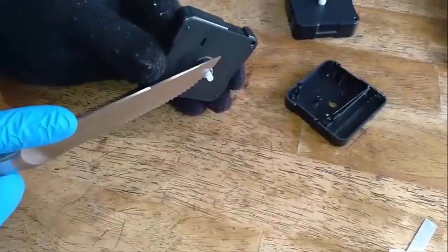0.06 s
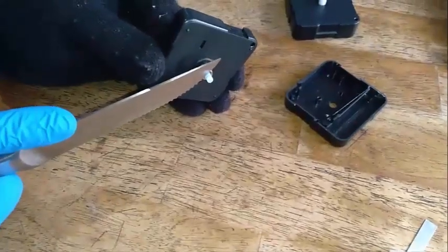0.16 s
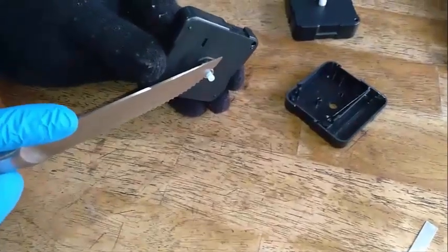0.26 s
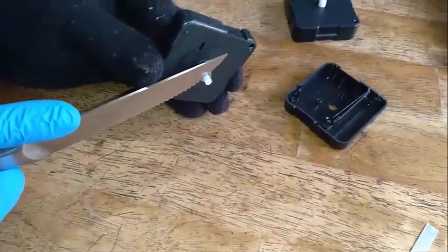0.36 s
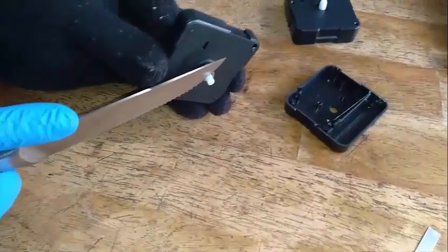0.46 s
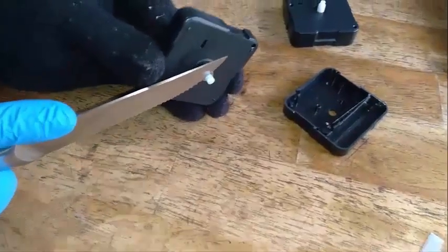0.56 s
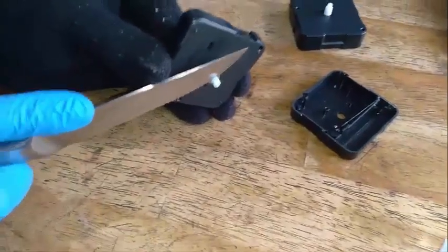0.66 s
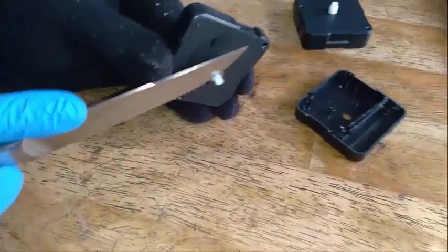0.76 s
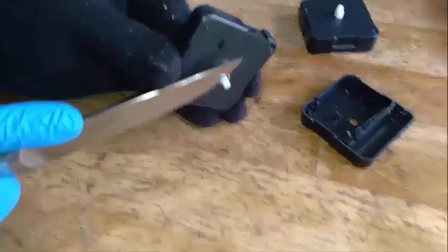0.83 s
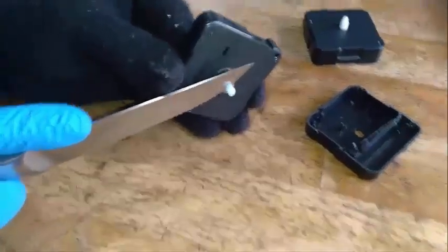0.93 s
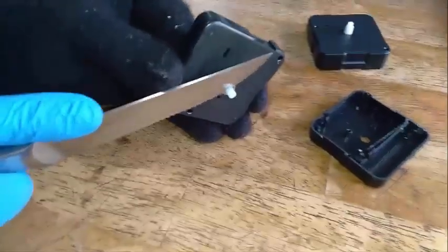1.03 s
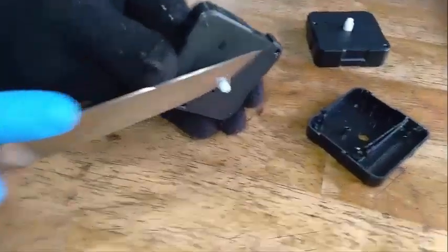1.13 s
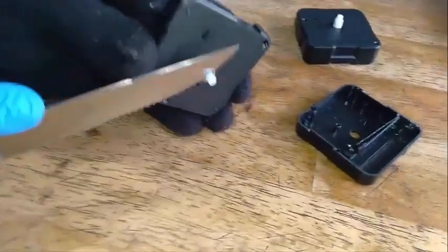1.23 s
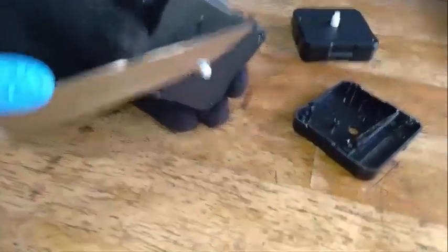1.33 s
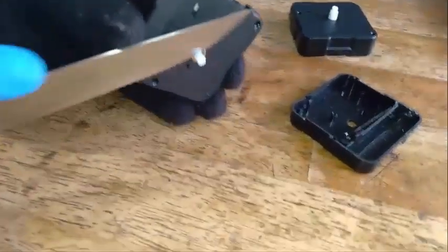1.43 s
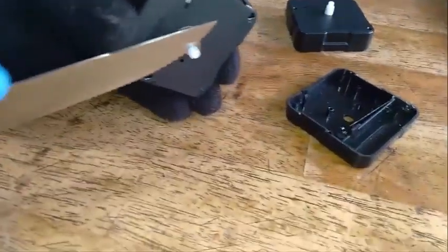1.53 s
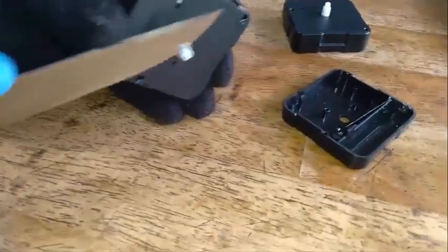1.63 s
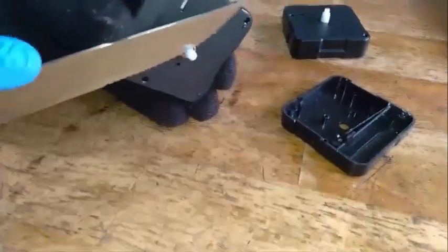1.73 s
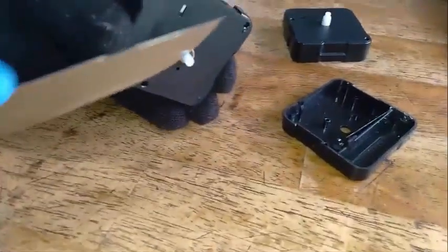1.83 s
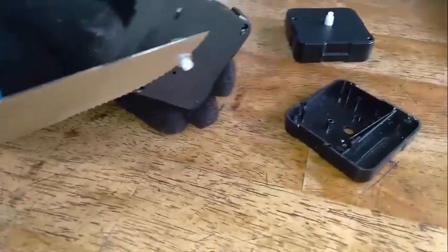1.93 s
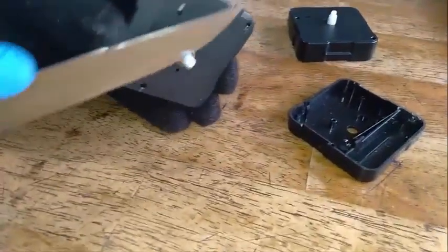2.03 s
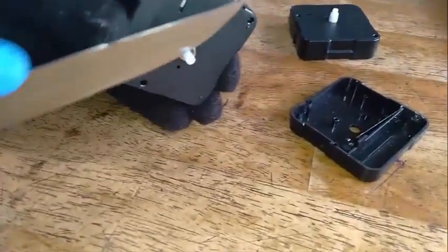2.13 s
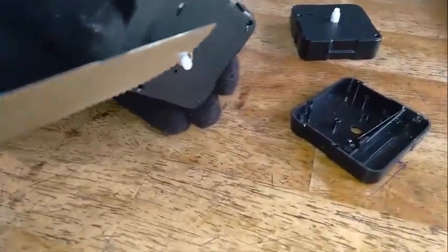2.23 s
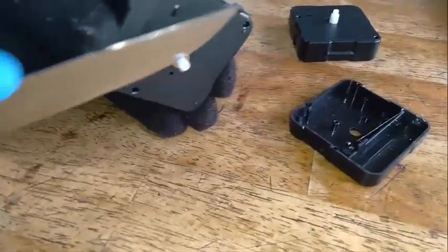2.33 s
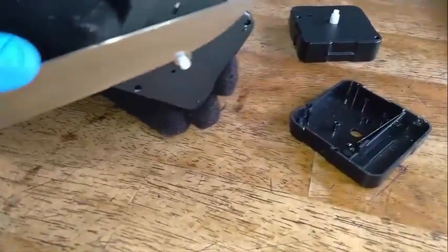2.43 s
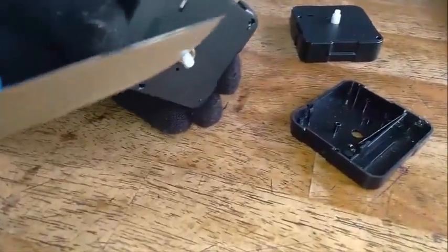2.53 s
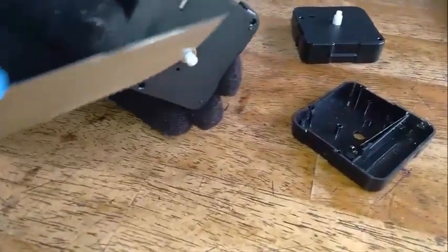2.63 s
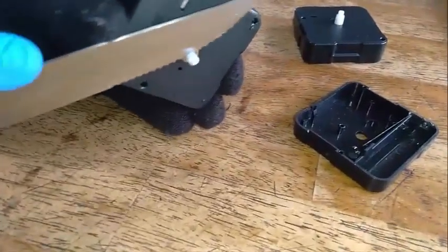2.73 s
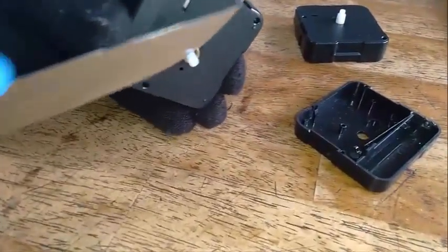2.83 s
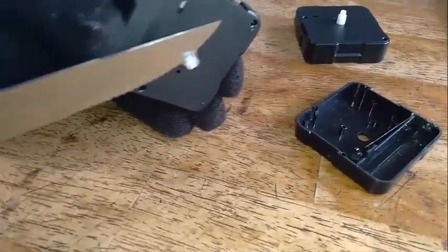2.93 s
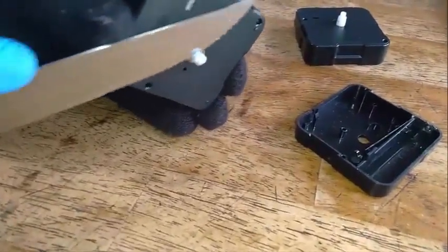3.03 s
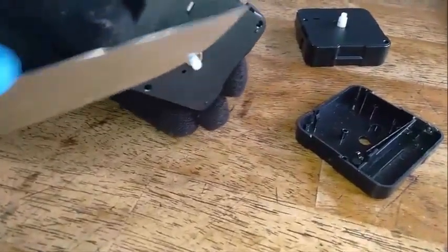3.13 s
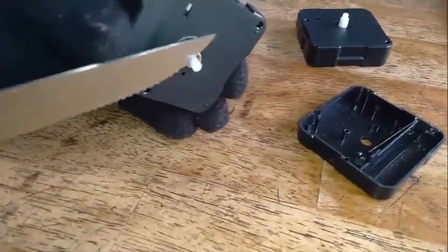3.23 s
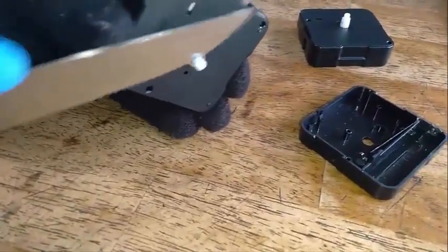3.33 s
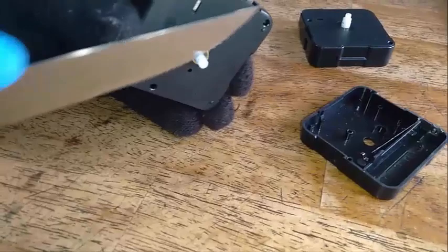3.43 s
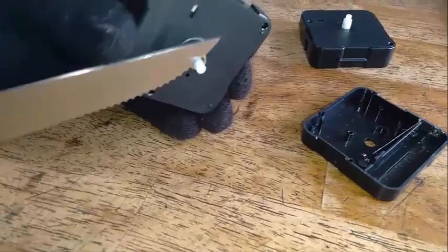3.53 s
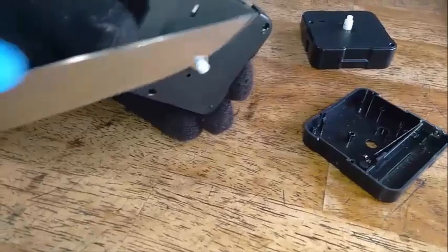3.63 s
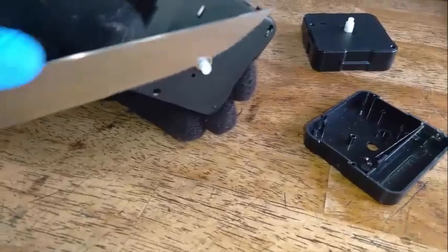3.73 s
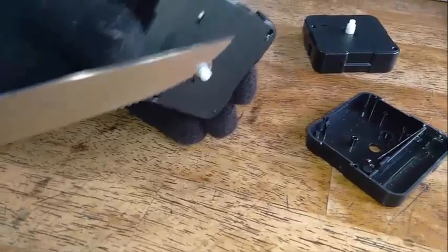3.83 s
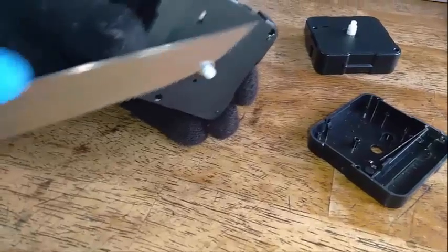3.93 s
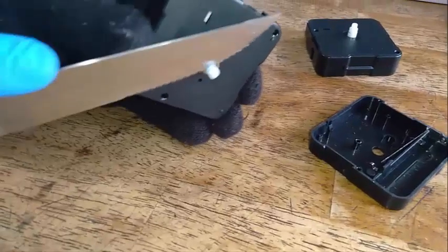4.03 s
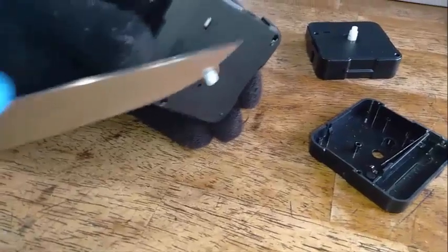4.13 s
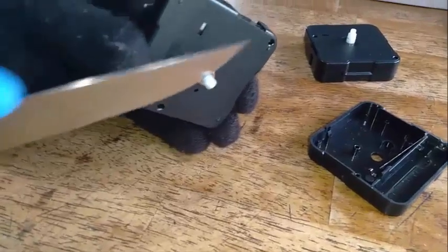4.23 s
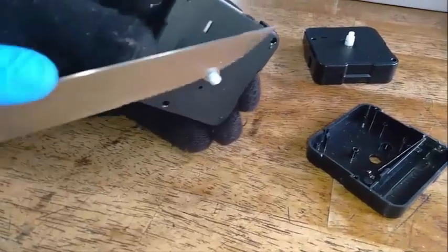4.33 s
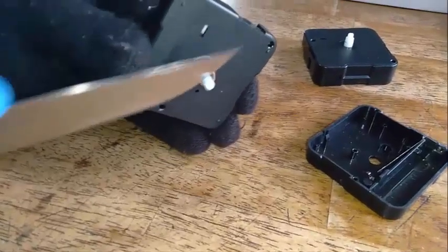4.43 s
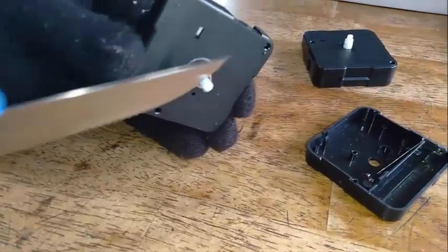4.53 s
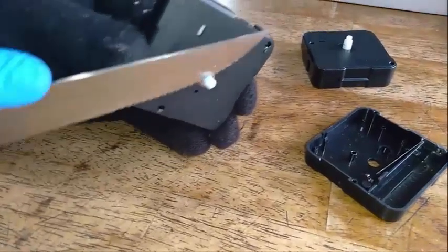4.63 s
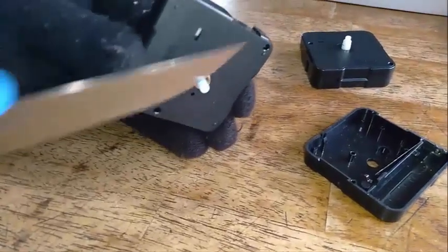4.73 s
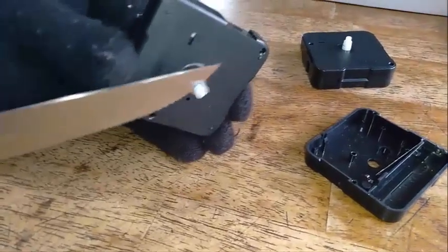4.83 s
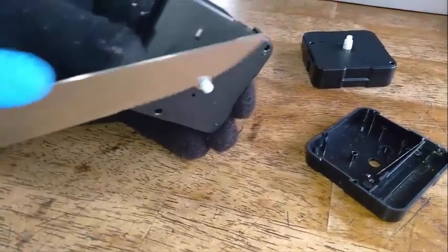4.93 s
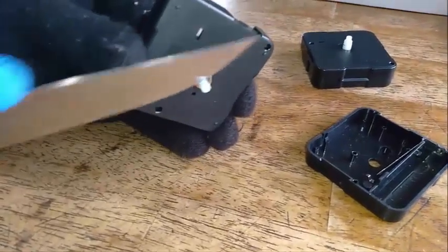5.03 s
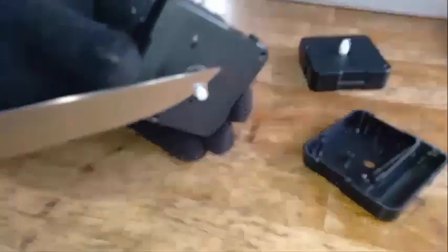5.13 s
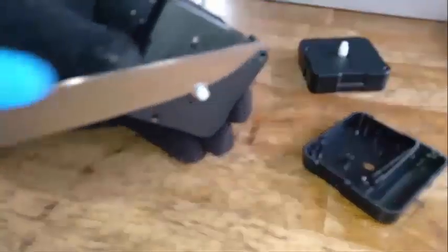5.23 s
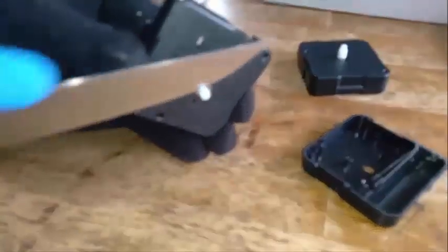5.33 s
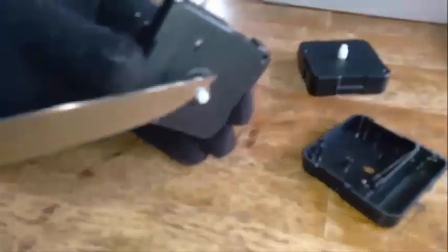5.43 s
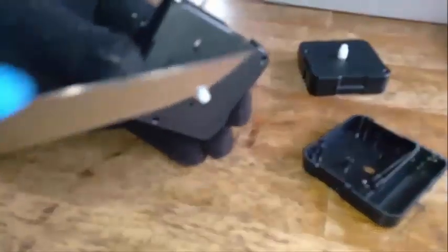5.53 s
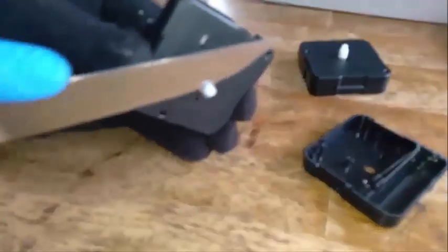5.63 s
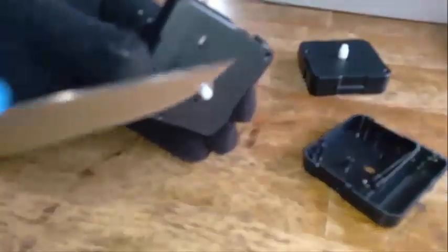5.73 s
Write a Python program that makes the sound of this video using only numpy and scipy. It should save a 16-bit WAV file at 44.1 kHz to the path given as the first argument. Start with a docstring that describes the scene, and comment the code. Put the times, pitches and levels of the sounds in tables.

```python
"""Light ticks over a faint motor hum, then rasping strokes: a serrated steel knife is set on the plastic
shaft of a small clock movement, held on a wooden bench, and saws back and forth. In each stroke a few
teeth catch and snap free; every snap rings the blade, rattles the hollow case and knocks the bench.
The blade rubs with a hiss and a faint groan during some strokes and between the early ones.
The strokes grow firmer as the cut deepens. Close stereo in a small, quiet room."""
import sys
import numpy as np
from scipy import signal
from scipy.fft import rfft, irfft, next_fast_len
from scipy.io import wavfile
from scipy.ndimage import map_coordinates

SR = 44100
rng = np.random.default_rng(int(sys.argv[2]) if len(sys.argv) > 2 else 0)


def wrap_up_sound(samples):
    """Save the sound to the file named by the first command line argument, as 16-bit audio."""
    columns = np.atleast_2d(samples).T
    # keep every value between -1 and 1, then stretch to whole-number steps
    tamed = np.clip(columns, -1, 1)
    steps = np.round(tamed * 32767).astype(np.int16)
    wavfile.write(sys.argv[1], SR, steps)


N = 254898


def amp(db):
    return 10 ** (np.asarray(db) / 20)


def unit_rms(x):
    return x / np.sqrt(np.mean(x ** 2) + 1e-20)


def unit_energy(spectra):
    """One stereo waveform of energy 1 per tooth."""
    x = irfft(spectra)
    return x / np.sqrt(np.sum(x ** 2, axis=(1, 2), keepdims=True))


def curve_at(points, hz):
    """Interpolate (freq_hz, value) points on a log frequency axis."""
    freq_hz, values = np.transpose(points)
    return np.interp(np.log(hz + 1), np.log(freq_hz + 1), values)


def pan(left_minus_right_db):
    return amp(np.array([[.5], [-.5]]) * left_minus_right_db)


def filtered(x, response):
    """Apply the gain response(hz)."""
    size = next_fast_len(N + SR // 2)
    return irfft(rfft(x, size) * response(np.fft.rfftfreq(size, 1 / SR)), size)[..., :N]


def wobble(rate_hz):
    """Smooth random curve, N samples."""
    knots = rng.standard_normal(int(N * rate_hz / SR) + 4)
    return map_coordinates(knots, [np.arange(N) * rate_hz / SR])


def minimum_phase(points, hz):
    """Causal response from (freq_hz, gain_db) points."""
    cepstrum = irfft(np.log(amp(curve_at(points, hz))))
    half = len(hz) - 1
    cepstrum[1:half] *= 2
    cepstrum[half + 1:] = 0
    return np.exp(rfft(cepstrum))


def resonance(hz, centre_hz, width_hz):
    """One damped mode."""
    return 1j * hz * width_hz / (centre_hz ** 2 - hz ** 2 + 1j * hz * width_hz)


def burst(envelopes, correlation=0.066):
    """Spectra of fresh stereo noise under each envelope."""
    noise = rng.standard_normal((len(envelopes), 2, envelopes.shape[-1]))
    mix_rad = np.arcsin(correlation) / 2
    stereo = np.cos(mix_rad) * noise + np.sin(mix_rad) * noise[:, ::-1]
    return rfft(envelopes * stereo)


# Air spectrum: freq_hz, gain_db
AIR_SPECTRUM = [(20, -1), (300, 4), (800, -6), (3000, -15), (9000, -11), (11500, -11), (16000, -15)]
def room_air(level_db=-95):
    """Still air: steady, dark noise."""
    noise = rng.standard_normal((2, N))
    return amp(level_db) * unit_rms(filtered(noise, lambda hz: amp(curve_at(AIR_SPECTRUM, hz))))


# Motor harmonics: multiple, level_db
MOTOR_HARMONICS = [(2, -89.5), (3, -94), (4, -99), (5, -94.5), (6, -100), (7, -102), (8, -97), (9, -108),
                   (10, -110), (11, -108), (14, -111)]
def motor_hum(rotation_hz=29.1, phase_spread_rad=0.31):
    """A motor somewhere in the room; each harmonic reaches left and right at its own phase."""
    t = np.arange(N) / SR
    hum = np.zeros((2, N))
    for multiple, level_db in MOTOR_HARMONICS:
        cycles = multiple * rotation_hz * t + rng.random()
        offset_rad = phase_spread_rad * rng.standard_normal((2, 1))
        hum += np.sqrt(2) * amp(level_db) * np.sin(2 * np.pi * cycles + offset_rad)
    return hum


# Room decay: freq_hz, t60_s
ROOM_DECAY = [(200, 0.29), (530, 0.54), (1400, 0.17), (3700, 0.25), (9700, 0.22), (15000, 0.22)]
# Reverb colour: freq_hz, gain_db
ROOM_COLOUR = [(100, -12), (600, -23), (2000, -15), (5000, -17.5), (10000, -19.5), (15000, -20)]
def room_reverb(dry, segments=8, delay_s=0.0068, build_s=0.0017):
    """Short diffuse tail off the walls, new for each segment as hands and knife move."""
    out = np.zeros((2, N))
    for part in np.array_split(np.arange(N), segments):
        hz, t, noise = signal.stft(rng.standard_normal((2, SR // 2)), SR, nperseg=256)
        t60_s = curve_at(ROOM_DECAY, hz)[:, None]
        onset = 1 - np.exp(-np.maximum(t - delay_s, 0) / build_s)
        tail = signal.istft(noise * amp(-60 * t / t60_s) * onset / np.sqrt(t60_s), SR, nperseg=256)[1]
        tail /= np.linalg.norm(tail[0])
        wet = signal.fftconvolve(dry[:, part], tail, axes=1)[:, :N - part[0]]
        out[:, part[0]:part[0] + wet.shape[1]] += wet
    return filtered(out, lambda hz: amp(curve_at(ROOM_COLOUR, hz)))


# Friction spectrum: freq_hz, gain_db
FRICTION_SPECTRUM = [(30, -28), (400, -10.5), (1000, -5.5), (1650, -15), (2700, -4.5), (4900, 7),
                     (7000, -3), (10000, 2), (12500, -11), (16000, -25)]
# Rubs, during some strokes and between the early ones: start_s, end_s, hiss_db, groan_db
BLADE_RUBS = [(0.495, 0.559, -69, -90), (0.56, .675, -86, -100), (0.857, 0.913, -55.5, -80),
              (0.882, 0.995, -66.5, -87), (1.187, 1.248, -50.5, -78), (1.257, 1.36, -81, -74),
              (1.427, 1.574, -62.5, -64), (1.538, 1.7, -81, -76), (1.871, 1.977, -47.5, -74),
              (4.474, 4.57, -48, -66), (5.108, 5.206, -49.5, -63), (5.458, 5.519, -43.5, -74)]
def rubbing(grain_db=3, grain_hz=700, groan_hz=1620, groan_width_hz=380):
    """Steel rubs over plastic: a grainy hiss and a faint groan of the case."""
    t = np.arange(N) / SR
    grains = rng.standard_normal((2, N)) * amp(grain_db * wobble(grain_hz))
    hiss = unit_rms(filtered(grains, lambda hz: amp(curve_at(FRICTION_SPECTRUM, hz))))
    groan = unit_rms(filtered(grains, lambda hz: resonance(hz, groan_hz, groan_width_hz)))
    out = np.zeros((2, N))
    for start_s, end_s, hiss_db, groan_db in BLADE_RUBS:
        arch = np.sin(np.pi * np.clip((t - start_s) / (end_s - start_s), 0, 1))
        out += arch * (amp(hiss_db) * hiss + amp(groan_db) * groan)
    return out


# Bench spectrum: freq_hz, gain_db
BENCH_SPECTRUM = [(20, -2), (70, -3.5), (170, -1.5), (300, -6), (500, -10.5), (1500, -19)]
def bench_knock(envelopes, hz):
    """The wood under the case answers each snap with a dull knock."""
    return unit_energy(minimum_phase(BENCH_SPECTRUM, hz) * burst(envelopes))


# Case modes: freq_hz, width_hz, gain_db
CASE_MODES = [(574, 160, -7), (1105, 240, -10.5), (1730, 140, -14), (2180, 146, -8), (3884, 76, -5),
              (4770, 730, 2.5), (5620, 360, 1.5)]
# Broadband shell spectrum: freq_hz, gain_db
SHELL_SPECTRUM = [(20, -33), (200, -15), (600, -6), (1100, -6), (2500, -4), (3200, -7.5), (4500, -3),
                  (6400, 8), (7600, -0.5), (12000, -30.5)]
def case_rattle(envelopes, colour, hz, shell_db=-6):
    """The hollow plastic case: modes of alternating sign plus broadband shell noise."""
    modes = sum((-1) ** k * amp(gain_db) * resonance(hz, freq_hz, width_hz)
                for k, (freq_hz, width_hz, gain_db) in enumerate(CASE_MODES))
    ring = modes * burst(envelopes)
    shell = amp(shell_db) * minimum_phase(SHELL_SPECTRUM, hz) * burst(envelopes)
    return unit_energy(colour * (ring + shell))


# Hold of the case against the bench: time_s, case_gain_db, bench_gain_db
CASE_HOLD = [(.4, -2.5, 3.5), (1.1, -1, -3.5), (1.8, -1, -2), (2.9, -1, -1.5), (3.5, 0, 1.5), (4.6, -1, 0),
             (5.8, 0.5, 2.5)]
def case_on_bench(when_s, envelopes, colour, hz, case_db=16, bench_db=-1):
    """The hold sets how strongly each snap sounds in the case and in the bench."""
    time_s, case_gain_db, bench_gain_db = np.transpose(CASE_HOLD)
    case_gain = amp(case_db + np.interp(when_s, time_s, case_gain_db))[:, None, None]
    bench_gain = amp(bench_db + np.interp(when_s, time_s, bench_gain_db))[:, None, None]
    return case_gain * case_rattle(envelopes, colour, hz) + bench_gain * bench_knock(envelopes, hz)


# Blade modes: freq_hz, width_hz, gain_db, left_minus_right_db, left_lead_rad
BLADE_MODES = [(6080, 350, -6.5, 6, 1.1), (7930, 300, -4.5, 11.5, 7), (8200, 150, -14, -3, -4),
               (8270, 220, -7, 11, -9), (9970, 62, 1, 0, 0.4), (10110, 370, 3.5, 2.5, 1.05),
               (10580, 420, -2.5, -9, 2.06), (12160, 450, -13.5, 15, 1.5), (14370, 590, -11, 3.5, -5.5)]
# Crack spectrum: freq_hz, gain_db
CRACK_SPECTRUM = [(20, -36.5), (300, -11), (3000, -8), (5000, -7), (7000, -1.5), (8300, 2.5), (11000, -1),
                  (11800, -3.5), (15500, -5.5), (16500, -9.5)]
def blade_ring(starts, envelopes, colour, hz, wander_hz=22, drift_widths=0.27, swing_db=3.5):
    """A bright crack plus steel modes that wander in pitch and level as the contact travels."""
    modes = 0
    for freq_hz, width_hz, gain_db, pan_db, lead_rad in BLADE_MODES:
        gain = amp(gain_db + swing_db * wobble(wander_hz)[starts, None, None])
        centre_hz = freq_hz + drift_widths * width_hz * wobble(wander_hz)[starts, None, None]
        radiation = pan(pan_db) * np.exp(1j * lead_rad * np.array([[.5], [-.5]]))
        modes += gain * radiation * resonance(hz, centre_hz, width_hz)
    ring = modes * burst(envelopes, correlation=0.54)
    crack = amp(-5) * minimum_phase(CRACK_SPECTRUM, hz) * burst(envelopes)
    return unit_energy(colour * (ring + crack))


def contact_colour(when_s, hz, spread_db=2.5, patch_hz=400, rate_hz=50):
    """Each contact point favours other frequencies; neighbouring teeth sound alike."""
    field = rng.standard_normal((512, 256))
    grid = np.meshgrid(when_s * rate_hz, hz / patch_hz, indexing="ij")
    return amp(spread_db * map_coordinates(field, grid, mode="wrap"))[:, None]


def snap_envelopes(t, rattle_t60_s, load_s=0.0074, crack_t60_s=0.016, grit_db=3.0, grit_hz=900):
    """Per tooth: a swelling scrape as it loads, a crack as it lets go at t = 0, a dying rattle."""
    scrape = amp(-12) * np.clip(1 + t / load_s, 0, 1) ** 2
    crack = amp(-60 * abs(t) / crack_t60_s)
    rattle = amp(-60 * (abs(t) / rattle_t60_s) ** 1.18)
    # the plastic tears in tiny uneven steps
    knots = rng.standard_normal((len(rattle_t60_s), 128))
    grid = np.meshgrid(np.arange(len(knots)), (t - t[0]) * grit_hz, indexing="ij")
    grit = map_coordinates(knots, grid, order=1)[:, None]
    return np.where(t < 0, scrape, np.hypot(rattle, crack)) * amp(grit_db * grit)


def stroke(start_s, length_s, tooth_count, entry_speed, exit_speed, entry_db, mid_db, exit_db,
           scatter_db=0.46, firm_bite_db=-23.5, light_t60_s=0.022, firm_extra_s=0.0051):
    """The hand swings like a pendulum, so evenly spaced teeth catch fastest inside the stroke."""
    entry_rad, exit_rad = np.arccos(np.clip([entry_speed, exit_speed], 0, .99))
    travel = np.linspace(0, 1, tooth_count)
    swing_rad = np.arcsin((travel - 1) * np.sin(entry_rad) + travel * np.sin(exit_rad))
    when_s = start_s + length_s * (swing_rad + entry_rad) / (entry_rad + exit_rad)
    pressure_arch = np.polyfit([0, .5, 1], [entry_db, mid_db, exit_db], 2)
    level_db = np.polyval(pressure_arch, travel) + scatter_db * rng.standard_normal(tooth_count)
    # the push into the case rises through the stroke; light bites get more case and sound duller
    push_db = -1 + 1.5 * travel + 0.19 * (firm_bite_db - level_db)
    t60_s = light_t60_s + firm_extra_s * amp(level_db - firm_bite_db) ** 2
    t60_s[0] *= 0.86
    return np.transpose([when_s, level_db, push_db, t60_s])


# Lone ticks as the knife is set down or turns round: start_s, level_db
LONE_TICKS = [(0.4126, -41.5), (0.4489, -35.5), (.5199, -56), (.5293, -52), (0.8438, -46.5),
              (1.4416, -39.5), (1.853, -42), (1.997, -51.5), (2.2004, -44.5), (2.4917, -43), (3.298, -54),
              (3.9187, -47), (4.449, -39), (5.1081, -37.5), (5.4317, -36.5)]
# Strokes, first catch to last (speeds 0-1, levels relative):
# start_s, length_s, tooth_count, entry_speed, exit_speed, entry_db, mid_db, exit_db
KNIFE_STROKES = [(.686, 0.064, 3, 0.88, 0.04, -33.5, -34.5, -38.5),
                 (0.8579, 0.042, 3, 0.74, .9, -36, -37.5, -42),
                 (1.0322, 0.069, 4, 0.82, 0.07, -35, -37.5, -40.5),
                 (1.1988, 0.057, 3, 1, 0.4, -37.5, -35, -45.5),
                 (1.358, 0.042, 3, 0.14, 0.8, -36, -28.5, -30),
                 (1.5272, 0.078, 5, .9, 0.43, -36, -30, -43.5),
                 (1.708, 0.053, 5, 0.81, 0.58, -36, -29.5, -31),
                 (1.8847, 0.065, 5, 0.82, 0.68, -32.5, -30.5, -42.5),
                 (2.054, 0.087, 6, 0.75, 0.12, -31, -25.5, -30.5),
                 (2.2215, 0.076, 5, 0.74, 0.2, -32, -29, -42.5),
                 (2.3865, 0.076, 7, 0.8, 0.59, -29, -25.5, -32.5),
                 (2.5268, 0.1, 8, 0.38, 0.27, -35.5, -30.5, -39),
                 (2.7313, 0.065, 6, 0.74, 0.29, -29.5, -25, -28.5),
                 (2.8829, 0.078, 6, 0.7, 0.41, -31.5, -28.5, -35),
                 (3.0647, 0.042, 4, 0.92, 0.44, -24, -26, -28.5),
                 (3.2214, 0.051, 5, 0.79, 0.77, -39, -28, -37),
                 (3.355, 0.076, 6, 0.93, 0.52, -26, -27.5, -29.5),
                 (3.53, 0.052, 5, 0.9, 0.9, -35, -31.5, -37.5),
                 (3.6841, 0.078, 7, 0.99, 0.44, -26, -27.5, -27.5),
                 (3.844, 0.052, 5, 0.9, .95, -34.5, -32.5, -34.5),
                 (4.0083, 0.061, 6, 0.81, 0.28, -25, -25, -25.5),
                 (4.1563, .0625, 6, .75, .75, -34, -28.5, -34), (4.3235, 0.047, 5, 0.86, .8, -27, -25, -25),
                 (4.4753, 0.06, 6, 0.63, 0.63, -29.5, -31.5, -36.5),
                 (4.626, 0.075, 7, 0.35, 0.27, -30, -24.5, -26.5),
                 (4.7971, 0.06, 6, 0.78, 0.79, -31, -29.5, -34.5),
                 (4.9604, 0.067, 7, 0.77, 0.34, -26, -25.5, -26.5),
                 (5.1216, 0.046, 5, 0.99, 0.64, -38, -28, -40.5),
                 (5.2706, 0.07, 8, 0.8, 0.58, -25.5, -24, -25.5),
                 (5.4435, 0.058, 7, 0.88, .55, -30, -29.5, -42),
                 (5.5917, 0.09, 9, 0.73, 0.21, -28.5, -26, -26),
                 (5.7608, 0.035, 4, 0.84, .9, -29.5, -30, -28)]
def sawing(blade_db=24.5, body_pan_db=2.0, tick_push_db=-1, tick_t60_s=0.018, size=2048):
    """Each tooth snaps free and sounds through the blade, the case and the bench below."""
    strokes = [stroke(*row) for row in KNIFE_STROKES]
    ticks = [(start_s, level_db, tick_push_db, tick_t60_s) for start_s, level_db in LONE_TICKS]
    teeth = np.vstack(strokes + [ticks])
    teeth = teeth[teeth[:, 0] < N / SR].T
    when_s = teeth[0]
    level_db, push_db, t60_s = teeth[1:, :, None, None]
    starts = np.round(when_s * SR).astype(int)
    lead = size // 4  # samples before the release
    t = (np.arange(size) - lead) / SR
    hz = np.fft.rfftfreq(size, 1 / SR)
    envelopes = snap_envelopes(t, t60_s)
    colour = contact_colour(when_s, hz)
    blade = amp(blade_db) * blade_ring(starts, envelopes, colour, hz)
    body = amp(push_db) * pan(body_pan_db) * case_on_bench(when_s, envelopes, colour, hz)
    snaps = amp(level_db) * (blade + body)
    out = np.zeros((2, N + size))
    for start, snap in zip(starts, snaps):
        out[:, start:start + size] += snap
    return out[:, lead:lead + N]


def scene():
    """The knife at work, its reverb and the background."""
    knife = sawing() + rubbing()
    return knife + room_reverb(knife) + room_air() + motor_hum()


def record(dry, ceiling=0.14, cutoff_hz=15850):
    """Soft peak limit, then a steep low-pass."""
    rounded = dry / (1 + (dry / ceiling) ** 4) ** (1 / 4)
    return filtered(rounded, lambda hz: 1 / np.sqrt(1 + (hz / cutoff_hz) ** 200))


dry = scene()
out = record(dry)
wrap_up_sound(out)
```